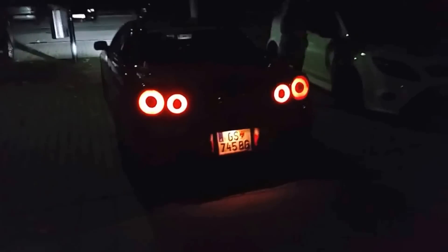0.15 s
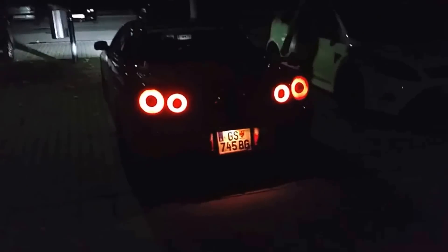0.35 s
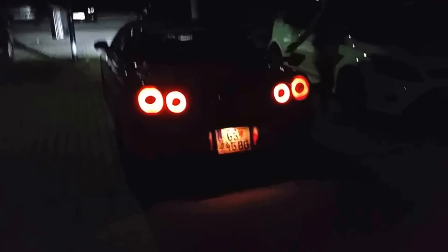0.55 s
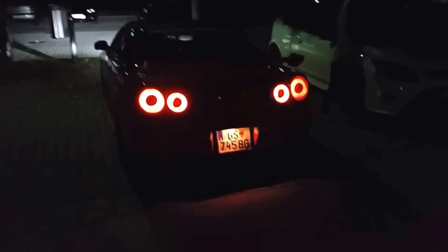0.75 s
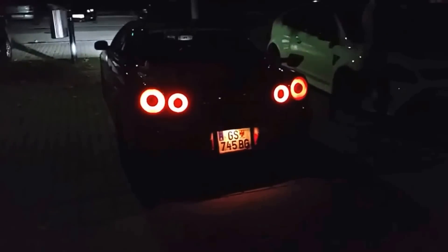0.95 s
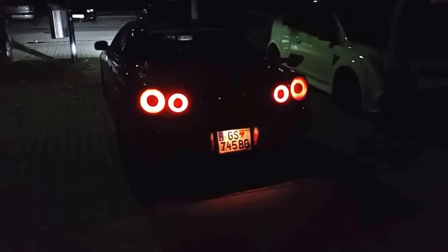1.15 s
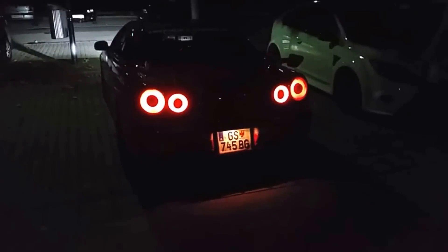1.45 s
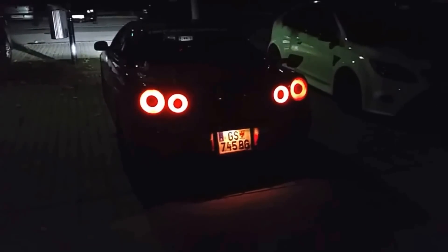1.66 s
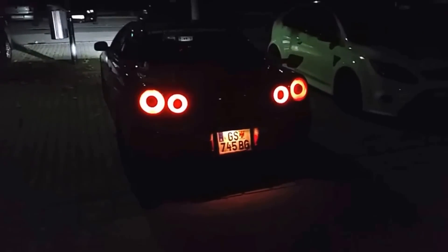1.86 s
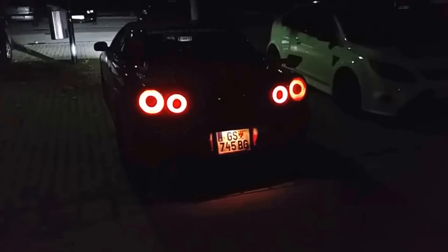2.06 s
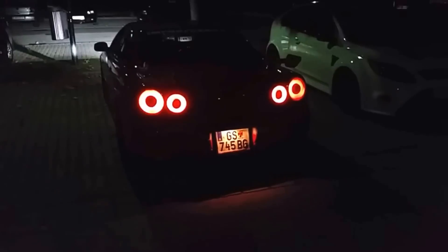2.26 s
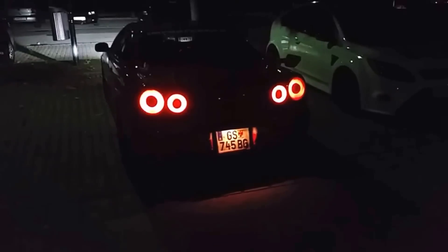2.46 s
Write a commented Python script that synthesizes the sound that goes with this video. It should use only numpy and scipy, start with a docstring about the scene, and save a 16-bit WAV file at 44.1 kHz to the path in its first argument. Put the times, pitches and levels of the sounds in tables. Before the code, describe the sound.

Lumpy sports car idle climbs into one hard rev, ending in quick exhaust pops and bangs.

```python
"""An open car park, behind a six-cylinder sports car that idles with a lumpy beat and is then revved hard.
Each firing sends a thump and a puff of rasping gas down the exhaust; under load the thumps merge into
a boom. At the rev limiter the ignition cuts and unburnt fuel goes off in two volleys of bangs that
overload the microphone."""
import sys
import numpy as np
from scipy import signal
from scipy.fft import rfft, irfft
from scipy.io import wavfile
from scipy.ndimage import uniform_filter1d

SR = 44100
rng = np.random.default_rng(int(sys.argv[2]) if len(sys.argv) > 2 else 0)


def waveform_to_disk(signal):
    """Save audio, clipped to [-1, 1], as 16-bit WAV at the path in sys.argv[1]."""
    frames = np.transpose(np.atleast_2d(signal))
    scaled = np.clip(frames, -1, 1) * 32767
    samples = np.round(scaled).astype(np.int16)
    wavfile.write(sys.argv[1], SR, samples)


N = 115542
TIME = np.arange(N) / SR


# (time [s], firing rate [Hz])
IDLE_HZ = [(0, 47.98), (.55, 48.1), (.65, 47.59), (1.27, 47.56), (1.33, 49.52)]
REV_HZ = [(1.37, 50.77), (1.42, 55.97), (1.55, 75.19), (1.704, 101.4), (1.894, 143.9), (2.006, 169.2),
          (2.1, 186.7), (2.174, 208.9), (2.3, 240.5), (2.35, 249.1)]
LIMITER_HZ = [(2.42, 246.4), (2.62, 241.3)]

def firing_rate():
    """Firings per second: idle, rev, limiter."""
    return in_time(IDLE_HZ + list(REV_HZ) + LIMITER_HZ)


# in firing order (strength [dB], lateness [firing intervals], pipe ring [Hz], ring [dB], puff [dB])
CYLINDERS = [(0.5, 0, 200, -10.5, -2.5), (-6, 0.062, 218.7, -1, -1), (-1.5, 0.00066, 250.3, -7, -0.5),
             (-2, 0.04, 250, -8, -2.5), (-1, 0.0012, 276, -8, -1), (-4, 0.03, 330, -1.5, -2.5)]
FIRST_FIRING_INTERVALS = .456

def firings(rate, idle_jitter_s=.00037, spread_db=.33):
    """Time and strength of each firing; the cylinders partly even out as speed rises."""
    count = np.cumsum(rate) / SR - FIRST_FIRING_INTERVALS
    k = np.arange(int(count[-1]))
    db, late = np.array(CYLINDERS)[k % len(CYLINDERS)].T[:2]
    idling = rate[0] / np.interp(k, count, rate)
    uneven = idling + .69 * (1 - idling)
    jitter, spread = rng.standard_normal((len(k), 2)).T
    times = np.interp(k + late * uneven, count, TIME) + idle_jitter_s * idling * jitter
    return times, db * uneven + spread_db * spread


# (time [s], level [dB])
NOTE_DB = [(0, -12.5), (.3, -12), (1.35, -12.5), (1.48, -13.5), (1.66, -16), (1.82, -15.5), (2.3, -26),
           (2.62, -33.5)]
# (frequency [Hz], gain [dB])
PIPE_COLOUR = [(10, -62), (25, -53.5), (48, -21.5), (70, -8.5), (95, 3.5), (120, 4.5), (145, 3.5),
               (185, 2.5), (215, 3), (275, 2), (305, -4.5), (340, -22.5), (385, -9.5), (425, -37),
               (620, -33.5), (1000, -52), (5500, -130)]

def exhaust_note(times, db, decay_s=.024):
    """Each firing thumps through the silencer and leaves its own pipe ringing."""
    pulses = clicks(times, from_db(db))
    t = TIME[TIME < 6 * decay_s]
    detune = 1 + .027 * rng.standard_normal(len(times))
    for k, start in enumerate((times * SR).astype(int)):
        hz, ring_db = CYLINDERS[k % len(CYLINDERS)][2:4]
        gain = from_db(db[k] + ring_db) * 2 * hz / SR
        ring = gain * np.cos(2 * np.pi * hz * detune[k] * t) * np.exp(-t / decay_s)
        pulses[start:start + len(t)] += ring[:N - start]
    return from_db(in_time(NOTE_DB)) * hold_rms(colour(-pulses, PIPE_COLOUR), samples=5500)


# (time [s], level [dB])
BOOM_DB = [(1.3, -39), (1.42, -28), (1.5, -19), (1.67, -14), (1.75, -20), (1.83, -13.5), (1.91, -17.5),
           (1.96, -13), (2.02, -8.5), (2.1, -5.5), (2.145, -13.5), (2.24, -13), (2.3, -5.5), (2.35, -4.5),
           (2.375, -27), (2.48, -12.5), (2.52, -21.5), (2.62, -15)]
# (frequency [x firing rate], level [dB], full from [s])
BOOM_PARTIALS = [(.5, -28.5, 2.105), (1.5, -22.5, 1.95), (2, -16, 1.52), (2.5, -24.5, 1.1), (3, -23.5, 1.8)]
# (frequency [Hz], gain [dB])
SILENCER_COLOUR = [(60, -39.5), (90, -12), (112, 3), (210, 1.5), (252, -7.5), (290, 2), (372, -5.5),
                   (405, -22), (800, -33)]

def boom(rate, rise_s=.17, waver_db=3.5, ignition_cut_s=2.35, cut_db=-2):
    """Under load the firings merge into a tone; the silencer passes its overtones only while low."""
    phase = boom_phase(rate)
    tone = from_db(in_time(BOOM_DB)) * np.cos(phase)
    cut = from_db(cut_db * np.clip((TIME - ignition_cut_s) / .03, 0, 1))
    for order, db, full_s in BOOM_PARTIALS:
        rise = np.clip(1 + (TIME - full_s) / rise_s, 0, 1)
        gain = from_db(db + at_hz(SILENCER_COLOUR, order * rate) + waver_db * waver())
        tone -= rise * cut * gain * np.cos(order * (phase + np.pi))
    return np.sqrt(2) * tone


def boom_phase(rate, lag_s=.004545):
    """The pressure wave leaves the pipe a little after each firing."""
    return 2 * np.pi * (np.cumsum(rate) / SR - FIRST_FIRING_INTERVALS - rate * lag_s)


# (frequency [x firing rate], level at the loudest boom [dB])
SNARL_HARMONICS = [(2, -44), (3, -27), (4, -36), (5, -37)]

def snarl(rate):
    """The loudest waves steepen in the pipe: harmonics grow with the cube of the boom."""
    phase, boom_db = boom_phase(rate), in_time(BOOM_DB)
    swell = from_db(boom_db - boom_db.max()) ** 3
    return np.sqrt(2) * swell * sum(from_db(db) * np.sin(order * phase) for order, db in SNARL_HARMONICS)


# (time [s], thump [dB], crack [dB], gas burst [dB])
BANGS = [(2.3554, -11, -17, -16), (2.363, -3, -13, -27), (2.376, -1, -7, -17), (2.384, -3.5, -27, -38),
         (2.395, -1, -23, -27), (2.426, -10, -35, -38), (2.456, -14.5, -28, -25), (2.521, 1.5, 1.5, -17.5),
         (2.5427, 2, -17, -12.5), (2.55, -10, -5, -25), (2.563, 0, -20, -21), (2.588, 0.5, -5.5, -20),
         (2.609, -2.5, -13, -32)]
# (time [s], level [dB])
SPRAYS = [(2.541, -25), (2.549, -26)]
# (frequency [Hz], gain [dB])
THUMP_COLOUR = [(10, -43), (30, -32), (60, -10), (95, 1.5), (140, -5.5), (175, 6.5), (205, -4.5), (240, 0),
                (295, 4), (400, -20.5), (520, -18), (850, -20), (1300, -38.5), (6000, -66), (16000, -87)]
CRACK_COLOUR = [(200, 3.5), (1000, 4.5), (2700, 5), (5000, -1), (9000, -15.5), (16000, -40)]
BURST_COLOUR = [(80, -2), (350, 2.5), (520, 6.5), (850, 2.5), (1250, -12), (2400, -9), (4000, -16),
                (7000, -25), (11000, -31), (16000, -52)]
SPRAY_COLOUR = [(1500, -15), (4000, -4), (6000, 2), (9000, -8.5), (16000, -10)]

def backfires(thump_lead_s=.00176):
    """Unburnt fuel goes off: each bang is a thump, a crack and a gas burst; two add a bright spray."""
    times, thump_db, crack_db, burst_db = np.transpose(BANGS)
    thumps = colour(clicks(times - thump_lead_s, from_db(thump_db)), THUMP_COLOUR)
    thumps /= np.abs(response(THUMP_COLOUR)).max()
    cracks = colour(clicks(times, -from_db(crack_db)), CRACK_COLOUR)
    cracks /= np.abs(response(CRACK_COLOUR)).max()
    sprays = gas_noise(decays(*np.transpose(SPRAYS), decay_s=.0031), SPRAY_COLOUR)
    bursts = gas_noise(decays(times, burst_db, decay_s=.0054), BURST_COLOUR)
    return thumps + cracks + sprays + bursts


def puffs(times, rate, points, decay_intervals, steady, spread_db, lead_s=.0005, echo_s=.01):
    """Turbulent gas swells and fades with each firing and echoes along the pipe; unit rms."""
    db = np.resize(np.array(CYLINDERS)[:, -1], len(times)) + spread_db * rng.standard_normal(len(times))
    latest = np.maximum(np.searchsorted(times - lead_s, TIME) - 1, 0)
    age = np.abs(TIME - times[latest] + lead_s) * rate / decay_intervals
    envelope = steady + from_db(db)[latest] * age * np.exp(1 - age)
    gas = envelope * rng.standard_normal(N)
    echoed = sum(.12 ** k * np.interp(TIME - k * echo_s, TIME, gas, left=0) for k in range(4))
    return hold_rms(colour(echoed, points), samples=3000)


# (time [s], level [dB])
RUSH_DB = [(1.1, -73), (1.3, -41), (1.45, -33.5), (1.85, -33), (2.08, -22.5), (2.2, -27.5), (2.32, -26),
           (2.37, -21), (2.46, -40.5), (2.62, -25)]
# (frequency [Hz], gain [dB])
RUSH_COLOUR = [(30, -33.5), (70, -13), (110, 9.5), (320, 9), (420, -1.5), (550, -4), (850, -3.5),
               (1100, -5), (1600, -6.5), (3000, -26), (6000, -38.5), (15000, -59)]

def rush(times, rate):
    """Low rush of exhaust gas during the rev."""
    gas = puffs(times, rate, RUSH_COLOUR, decay_intervals=.14, steady=.22, spread_db=1)
    return from_db(in_time(RUSH_DB)) * gas


# (time [s], level [dB])
JET_DB = [(1.8, -58), (1.94, -25), (2.03, -35), (2.11, -31.5), (2.17, -35), (2.27, -26), (2.32, -30.5),
          (2.37, -31), (2.44, -39.5), (2.5, -34), (2.62, -33)]
# (frequency [Hz], gain [dB])
JET_COLOUR = [(400, -12), (1300, -9.5), (1700, 3), (1890, -9), (2160, 5), (2900, -1), (4200, -12),
              (5000, -11.5), (6000, -19), (7800, -21.5), (11000, -31.5), (16000, -45)]

def jet(times, rate):
    """Brighter, steadier gas jet at high revs."""
    gas = puffs(times, rate, JET_COLOUR, decay_intervals=.2, steady=.56, spread_db=4)
    return from_db(in_time(JET_DB)) * gas


# (time [s], level [dB])
RASP_DB = [(.9, -79.5), (1.17, -55.5), (1.3, -50.5), (1.39, -43), (1.45, -33), (1.58, -29.5), (1.67, -36),
           (1.75, -30), (1.86, -30), (1.95, -34), (2.05, -39.5), (2.3, -52.5)]
# (frequency [Hz], gain [dB])
RASP_COLOUR = [(300, -21), (870, -7), (1100, -13), (1500, -4), (1920, -15), (2250, -1), (2420, 2),
               (2650, -5), (3050, -13), (3300, -7), (3680, -9), (4150, -27), (4450, -24), (4800, -12),
               (5100, -15), (5900, -29), (6450, -29), (7400, -21), (9700, -31), (12500, -50), (16000, -64)]

def rasp(times, rate, spread_db=1.3, tailpipe_db=-5):
    """Sharp gas puffs and ringing metal as the revs climb."""
    gas = puffs(times, rate, RASP_COLOUR, decay_intervals=.13, steady=.07, spread_db=spread_db)
    return from_db(in_time(RASP_DB)) * (gas + from_db(tailpipe_db) * tailpipe(times, spread_db))


# (frequency [Hz], level [dB], T60 [s])
TAILPIPE_MODES = [(2370, 1, 0.043), (3300, -10, 0.01), (4800, -20, 0.03)]

def tailpipe(times, spread_db):
    """Every firing knocks the metal tailpipe, which rings briefly; unit rms."""
    t = TIME[:4096]
    ring = sum(from_db(db - 60 * t / t60) * np.sin(2 * np.pi * hz * t) for hz, db, t60 in TAILPIPE_MODES)
    knocks = clicks(times, from_db(spread_db * rng.standard_normal(len(times))))
    return hold_rms(signal.fftconvolve(knocks, ring)[:N], samples=3000)


# (frequency [Hz], gain [dB])
SOFT_PUFF_COLOUR = [(100, 2), (300, 2), (450, -5), (650, -4), (850, -1), (1000, -5), (1300, -4.5),
                    (1850, -14), (2450, -7), (3300, -18), (4100, -29), (5000, -30), (5600, -46),
                    (7500, -50), (12000, -62)]

def soft_puffs(times, rate, level_db=-43):
    """Gas puffs at a constant level, heard at idle."""
    gas = puffs(times, rate, SOFT_PUFF_COLOUR, decay_intervals=.22, steady=.17, spread_db=2)
    return from_db(level_db) * gas


# (time [s], spit [dB], splutter [dB])
SPITS = [(0.173, -51, -38), (0.427, -50, -37), (1.053, -47, -35.5), (1.181, -51, -31.5),
         (1.286, -37.5, -31), (1.364, -32.5, -30), (1.423, -32.5, -47.5), (1.438, -25, -36),
         (1.501, -23.5, -36.5), (1.582, -24.5, -43.5), (1.694, -24, -23.5), (1.752, -27.5, -41)]

def spits():
    """A rough firing gives a bright spit and a longer, duller splutter."""
    times, spit_db, splutter_db = np.transpose(SPITS)
    spit = gas_noise(decays(times, spit_db, decay_s=.0022), RASP_COLOUR)
    splutter = gas_noise(decays(times, splutter_db, decay_s=.013), SOFT_PUFF_COLOUR)
    return spit + splutter


# (frequency [Hz], gain [dB])
CHUFF_COLOUR = [(300, -40), (540, -18), (620, 0), (720, -12), (1150, -20), (3000, -54.5), (7000, -90)]

def chuffs(times, level_db=-34.5, delay_s=.0064):
    """The last cylinder chuffs hollowly once per engine cycle and sets the lope of the idle."""
    last_cylinder = times[len(CYLINDERS) - 1::len(CYLINDERS)]
    return gas_noise(decays(last_cylinder + delay_s, level_db, decay_s=.015), CHUFF_COLOUR)


# (time [s], level [dB])
CHINK_DB = [(0, -65.5), (.9, -63), (1.1, -60.5), (1.35, -54.5), (1.52, -38), (1.7, -58), (2.0, -63)]
# (frequency [Hz], gain [dB])
CHINK_COLOUR = [(3900, -36), (4450, -20), (4650, 0), (5000, 0), (5400, -28), (6200, -40), (12000, -60)]

def chink(times, rate):
    """Thin metallic chink of a heat shield, standing out on some firings."""
    pulses = puffs(times, rate, CHINK_COLOUR, decay_intervals=.18, steady=.09, spread_db=5.5)
    return from_db(in_time(CHINK_DB)) * pulses


# (frequency [Hz], gain [dB])
HISS_COLOUR = [(2000, -28), (4800, 5.5), (7000, -2), (9000, -17), (14000, -13), (15700, -2)]

def hiss(peak_s=1.1, width_s=.024, peak_db=-56):
    """Brief faint hiss just before the rev."""
    return gas_noise(from_db(peak_db) * np.exp(-((TIME - peak_s) / width_s) ** 2), HISS_COLOUR)


# (frequency [Hz], gain [dB])
RUMBLE_COLOUR = [(8, -12.5), (25, 4), (45, 5), (100, -5.5), (300, -23), (5000, -96)]

def rumble(rate, idle_db=-48.5):
    """Deep rumble that fades as the revs rise."""
    return gas_noise(from_db(idle_db) * (rate[0] / rate) ** 2, RUMBLE_COLOUR)


# (frequency [Hz], left minus right [dB])
BALANCE_DB = [(100, -3.5), (380, -5.5), (700, -7), (1300, -11.5), (2400, -19), (4400, -22.5), (8000, -12),
              (15000, 2)]
# (frequency [Hz], gain [dB])
SCATTER_COLOUR = [(100, -23), (350, -23), (700, -9.5), (1300, -6), (2500, -8), (8000, -5)]

def car_park(x, decay_s=.091, right_scatter_db=1):
    """The tailpipe is to the right; ground and parked cars scatter a short tail to each ear."""
    hz, balance_db = np.transpose(BALANCE_DB)
    ratio = from_db(balance_db)
    left, right = 2 * ratio / (1 + ratio), 2 / (1 + ratio)
    ears = []
    for share, wet in ((left, 1), (right, from_db(right_scatter_db))):
        tail = rng.standard_normal(N) * np.exp(-TIME / decay_s)
        scattered = colour(signal.fftconvolve(x, tail / np.linalg.norm(tail))[:N], SCATTER_COLOUR)
        ears.append(colour(x + wet * scattered, np.c_[hz, 20 * np.log10(share)]))
    return np.array(ears)


def from_db(db):
    return 10 ** (np.asarray(db) / 20)


def in_time(rows):
    """Piecewise-linear curve over time."""
    return np.interp(TIME, *np.transpose(rows))


def at_hz(points, hz):
    """Gain in dB, interpolated over log frequency."""
    f, db = np.transpose(points)
    return np.interp(np.log(hz + 1e-9), np.log(f), db)


def response(points, size=8192):
    """Minimum-phase impulse response of a colour."""
    gain = from_db(at_hz(points, np.fft.rfftfreq(size, 1 / SR)))
    cepstrum = irfft(np.log(gain))
    cepstrum[1:size // 2] *= 2
    cepstrum[size // 2 + 1:] = 0
    return irfft(np.exp(rfft(cepstrum)))[:size // 2]


def colour(x, points):
    return signal.fftconvolve(x, response(points))[:N]


def clicks(times, sizes):
    """Impulses placed between samples."""
    out, at = np.zeros(N + 2), np.clip(times * SR, 0, N)
    np.add.at(out, at.astype(int), sizes * (1 - at % 1))
    np.add.at(out, at.astype(int) + 1, sizes * (at % 1))
    return out[:N]


def hold_rms(x, samples):
    """Holds the running rms at one."""
    power = uniform_filter1d(uniform_filter1d(x ** 2, samples), samples)
    return x / np.sqrt(np.abs(power) + 1e-14)


def decays(times, db, decay_s):
    """Envelope that jumps at each time and dies away."""
    return signal.lfilter([1], [1, -np.exp(-1 / (decay_s * SR))], clicks(times, from_db(db)) + 1e-18)


def gas_noise(envelope, points):
    """Coloured noise whose rms follows the envelope."""
    return colour(envelope * rng.standard_normal(N), points) / np.linalg.norm(response(points))


def waver(count=100):
    """Slow random wander, spread about one."""
    return np.interp(TIME, np.linspace(0, TIME[-1], count), rng.standard_normal(count))


def scene():
    """All exhaust layers, placed in the car park."""
    rate = firing_rate()
    times, db = firings(rate)
    gas = soft_puffs(times, rate) + rasp(times, rate) + rush(times, rate) + jet(times, rate)
    faint = chink(times, rate) + hiss() + rumble(rate)
    engine = exhaust_note(times, db) + boom(rate) + snarl(rate)
    bursts = chuffs(times) + spits() + backfires()
    return car_park(engine + bursts + gas + faint)


def record(dry, knee=4.9, cutoff_hz=15850):
    """The microphone overloads on the loudest peaks; the top is cut."""
    squashed = dry / (1 + np.abs(dry) ** knee) ** (1 / knee)
    return signal.sosfilt(signal.ellip(10, .1, 80, cutoff_hz, fs=SR, output="sos"), squashed)


dry = scene()
out = record(dry)
waveform_to_disk(out)
```